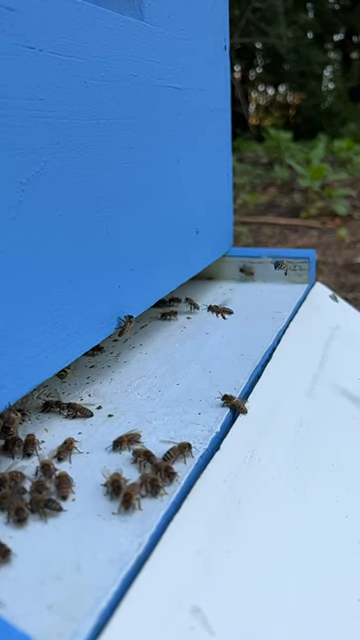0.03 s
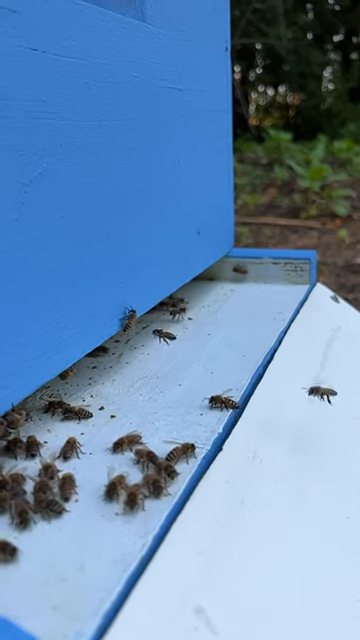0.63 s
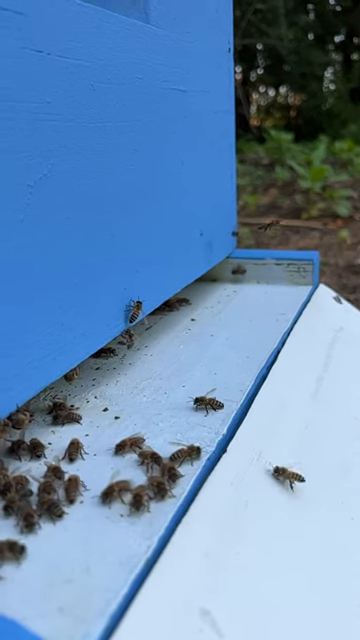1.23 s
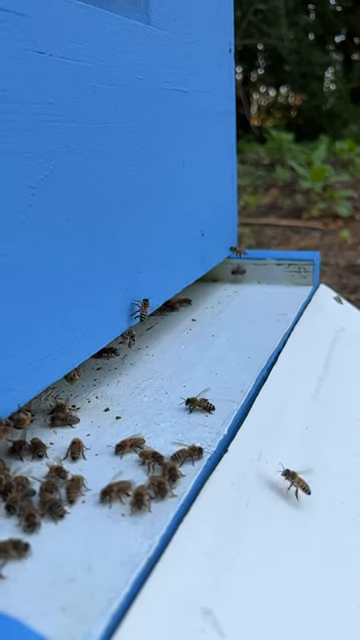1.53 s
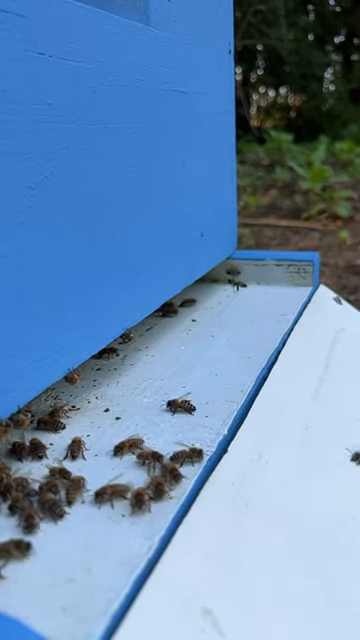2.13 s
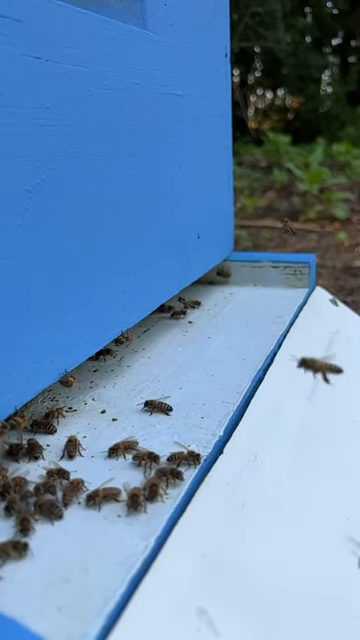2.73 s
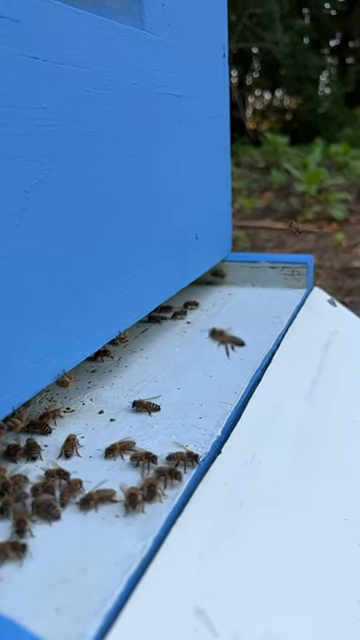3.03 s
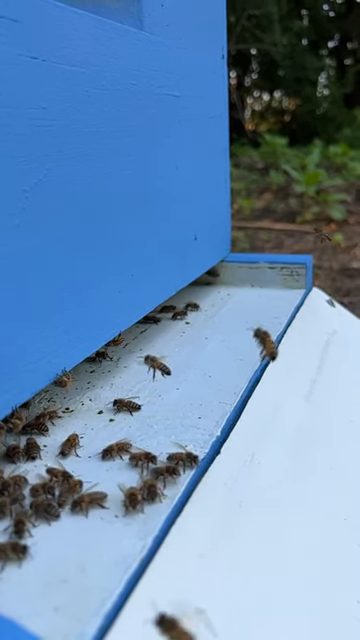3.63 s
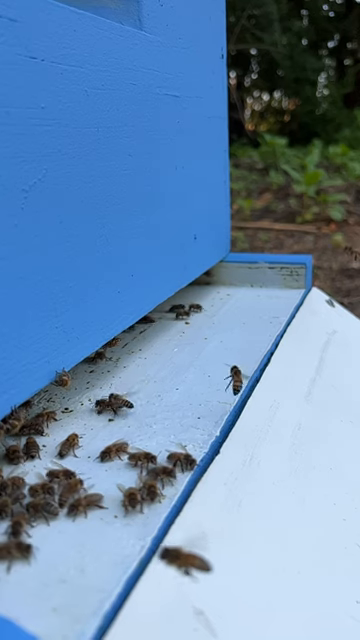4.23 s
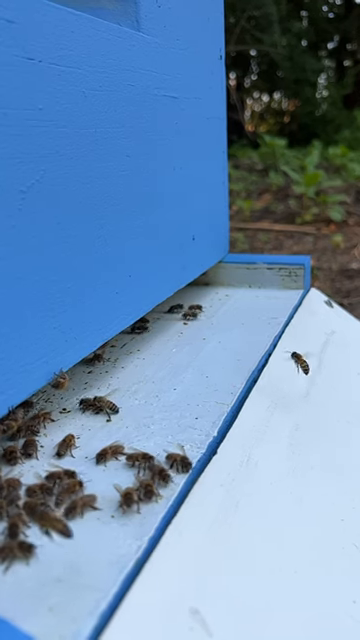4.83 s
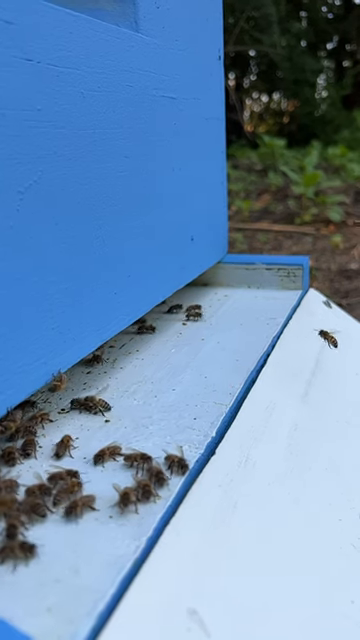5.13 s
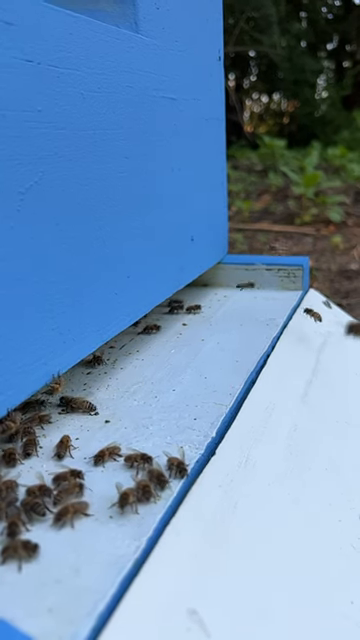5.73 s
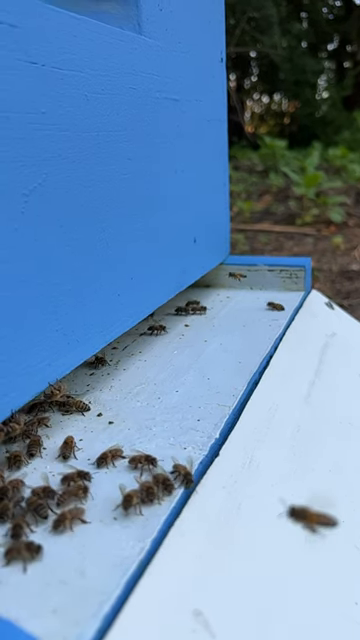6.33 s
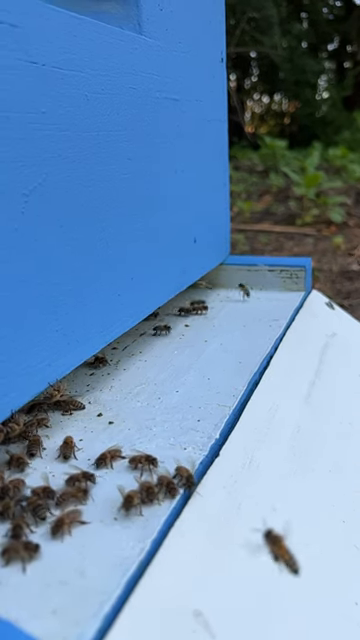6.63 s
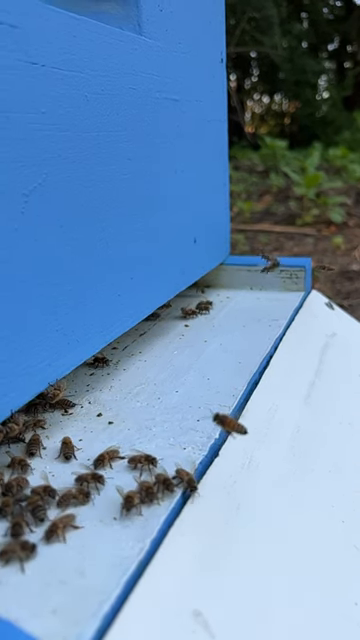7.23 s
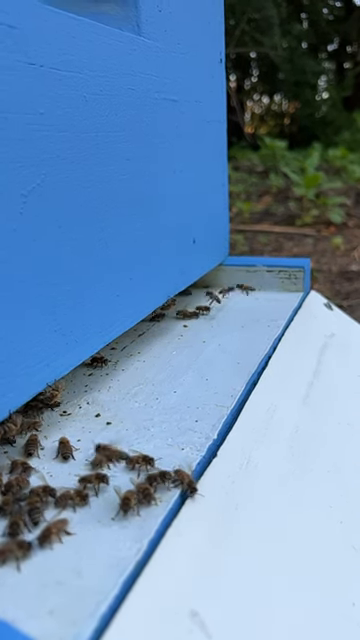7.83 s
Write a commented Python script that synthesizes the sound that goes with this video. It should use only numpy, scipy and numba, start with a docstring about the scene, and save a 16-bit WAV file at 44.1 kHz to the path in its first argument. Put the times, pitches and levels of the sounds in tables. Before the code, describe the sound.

Honeybees buzz steadily around a hive entrance outdoors, over a deep, wavering drone and a faint rustle of wings.

```python
"""At a hive entrance outdoors, honeybees buzz as if in slow motion, over a deep drone that hops in pitch.
Each flying bee buzzes with overtones, whole multiples of its wingbeat; where these crowd together,
the strongest takes the lead. The lowest tone jumps about and drops into deep throbs, while single
bees glide close by and sing out above the swarm. The high tones blend into a rustle of wings,
and faint outdoor air lies behind."""
import sys
import numpy as np
from scipy import signal
from scipy.fft import rfft, irfft, next_fast_len
from scipy.io import wavfile
from scipy.ndimage import uniform_filter1d
from numba import njit

SR = 44100
rng = np.random.default_rng(int(sys.argv[2]) if len(sys.argv) > 2 else 0)


def wav_out(sig):
    """Save sig, one row per channel (or a flat mono array), as 16-bit PCM at SR to the path in sys.argv[1]."""
    wavfile.write(sys.argv[1], SR, np.round(np.clip(np.atleast_2d(sig).T, -1, 1) * 32767).astype(np.int16))


N = 356504
HOP = 64   # samples from one tick to the next; pitch and level are set at each tick
TICKS = np.arange(N // HOP + 2) * HOP / SR
HARMONICS = np.arange(2, 15)[:, None]   # overtones at 2 to 14 times the wingbeat
LEAD_RATE_HZ, CUTOFF_HZ = 2.8, 15800   # how fast overtones trade the lead; top of the sound


def from_db(db):
    """Turn decibels into a number to multiply a sound by."""
    return 10 ** (np.asarray(db) / 20)


def in_time(rows):
    """Read a table that starts with a time column at every tick."""
    time_s, *columns = np.transpose(rows)
    return [np.interp(TICKS, time_s, column) for column in columns]


def at_hz(points, hz):
    """Read a table at any pitch, giving every octave equal room."""
    pitch_hz, value = np.transpose(points)
    return np.interp(np.log(np.maximum(hz, 1)), np.log(pitch_hz), value)


def drift(rate_hz, count):
    """Smooth random curves, typically 1 away from zero, moving not much faster than rate_hz."""
    size = next_fast_len(len(TICKS))
    hz = np.arange(size // 2 + 1) * SR / HOP / size
    noise = rfft(rng.standard_normal((count, size)))
    slow = irfft(noise * np.exp(-.5 * (hz / rate_hz) ** 2), size)[:, :len(TICKS)]
    return slow / slow.std()


def flicker(count):
    """Swelling and fading, several times a second, as bees turn and pass."""
    return np.minimum(.3 * drift(1.5, count) + drift(6.5, count), 2.0)


def held_notes(rows, slide_s, swell_s, arch_db=4):
    """Each note holds its pitch until the next and swells in the middle; the steps are rounded off."""
    start_s, hz, level_db = np.transpose(rows)
    edges_s = np.append(np.sort(start_s), TICKS[-1] + 0.011)
    place = np.interp(TICKS, edges_s, np.arange(len(edges_s)))
    note = place.astype(int)
    arch = arch_db * (np.sin(np.pi * (place % 1)) - 2 / np.pi)
    rounded = lambda steps, width_s: uniform_filter1d(steps, size=max(1, int(width_s * SR / HOP)))
    return rounded(hz[note], slide_s), rounded(level_db[note] + arch, swell_s)


@njit
def oscillators(turn, gain, hop, size):
    """Add up pure tones, each a point spinning on a circle; each ear's gain glides between ticks."""
    out = np.zeros((2, turn.shape[1] * hop))
    for tone in range(turn.shape[0]):
        point = 1 + 0j
        for tick in range(turn.shape[1] - 1):
            left, right = gain[0, tone, tick], gain[1, tone, tick]
            if abs(left) + abs(right) > 1e-7:
                left_step = (gain[0, tone, tick + 1] - left) / hop
                right_step = (gain[1, tone, tick + 1] - right) / hop
                for i in range(hop):
                    point *= turn[tone, tick]
                    out[0, tick * hop + i] += ((left + i * left_step) * point).real
                    out[1, tick * hop + i] += ((right + i * right_step) * point).real
    return out[:, :size]


# How much weaker bees make a tone tremble: pitch_hz, roughness (0 to 1)
ROUGHNESS = [(60, .03), (120, .035), (220, .07), (450, .075), (700, .08), (2200, .11), (3500, .24),
             (8000, .3)]
# Which side the sound sits on: pitch_hz, lean (-1 right to 1 left)
SIDE_LEAN = [(70, 0), (200, -0.0542), (380, -0.16), (700, -0.74), (1300, 0), (2400, -0.16), (5000, 0.02),
             (15000, -0.05)]
# How far it scatters between the ears: pitch_hz, scatter_db
SIDE_SCATTER = [(60, -18.5), (130, -26), (220, -15), (400, -7.5), (700, 0), (1400, -9), (3000, -3),
                (6000, -2.5), (14000, -1)]

def tones(hz, level_db, roam_hz):
    """Gliding tones, roughened by weaker bees beating against them, each roaming between the ears."""
    count, beat_hz = len(hz), 60
    beating = 1 + at_hz(ROUGHNESS, hz) * (drift(beat_hz, count) + 1j * drift(beat_hz, count))
    start_phase = np.exp(2j * np.pi * rng.random((count, 1)))
    middle = np.sqrt(2) * from_db(level_db) * beating * start_phase
    roam = (drift(roam_hz, count) + 1j * drift(roam_hz, count)) / np.sqrt(2)
    side = at_hz(SIDE_LEAN, hz) + from_db(at_hz(SIDE_SCATTER, hz)) * roam
    ears = np.array([middle * (1 + side), middle * (1 - side)])
    return oscillators(np.exp(2j * np.pi * hz / SR), ears, HOP, N)


# The notes of the lowest, strongest tone: start_s, pitch_hz, level_db
DRONE_NOTES = [(0.0, 115, -44), (0.08, 119, -47.5), (0.17, 75.6, -49), (0.24, 98.6, -52), (0.29, 61, -41.5),
               (0.37, 110.8, -48), (0.49, 118.4, -41.5), (0.54, 63.4, -42), (0.63, 99.8, -56.5),
               (0.66, 77, -49), (0.69, 97.3, -45), (0.76, 94.7, -49), (0.82, 103.8, -45.5),
               (0.9, 84.8, -47), (0.94, 84.5, -41.5), (1.03, 109.3, -50.5), (1.09, 65.3, -50),
               (1.12, 109, -45), (1.24, 134.7, -48.5), (1.33, 57, -44), (1.43, 135.4, -58),
               (1.46, 124.7, -43), (1.52, 111, -49), (1.59, 63, -47), (1.63, 122.4, -45.5),
               (1.69, 104.3, -39), (1.73, 88, -41.5), (1.77, 71, -42.5), (1.84, 84.1, -45.5),
               (1.93, 68.4, -45), (1.99, 114.5, -41), (2.05, 57.8, -38), (2.08, 60, -32.5),
               (2.18, 58.8, -41), (2.28, 62.9, -31.5), (2.35, 104, -38.5), (2.4, 61.6, -33),
               (2.43, 65, -28.0), (2.51, 65.9, -34.0), (2.54, 66.7, -41.5), (2.61, 63.8, -36.5),
               (2.68, 58.8, -41.0), (2.71, 129.6, -45), (2.78, 70.8, -44), (2.82, 70.9, -35.5),
               (2.89, 122, -43), (3.0, 124.4, -49), (3.12, 146.5, -46.5), (3.19, 133.7, -47.5),
               (3.27, 120.4, -48), (3.32, 126.5, -43.5), (3.54, 99.2, -43), (3.65, 124.8, -42),
               (3.71, 80.2, -41), (3.78, 63.6, -41.5), (3.94, 120.7, -46), (4.05, 107.7, -44.5),
               (4.22, 54.6, -51), (4.26, 123.5, -44), (4.42, 106, -43), (4.45, 76, -49.5),
               (4.55, 108, -49.5), (4.59, 119.8, -42.5), (4.71, 129.4, -47), (4.8, 64.1, -42.5),
               (4.84, 83.5, -53), (4.87, 125.6, -45), (4.92, 71.6, -44.5), (4.95, 109.4, -37),
               (5.01, 110, -44), (5.05, 96.8, -48), (5.11, 121.2, -46.5), (5.28, 61.2, -42.5),
               (5.4, 126.8, -46.5), (5.5, 120, -38.5), (5.54, 65.7, -45), (5.58, 121.5, -42.5),
               (5.71, 145.3, -51), (5.74, 63.2, -44), (5.82, 104.1, -44), (5.86, 125.2, -45),
               (5.93, 64, -49.5), (5.99, 125.6, -46), (6.04, 119.6, -38.5), (6.1, 70.1, -43),
               (6.13, 118.4, -44.5), (6.2, 116.7, -50), (6.27, 106.7, -42), (6.41, 68, -44),
               (6.44, 122, -43.5), (6.56, 124.1, -57), (6.59, 66.5, -47), (6.62, 113.5, -45),
               (6.68, 126.8, -46.5), (6.71, 60.5, -49), (6.79, 105.9, -42), (6.84, 119.4, -46.5),
               (7.01, 107.4, -40.5), (7.07, 78.9, -43), (7.1, 128.7, -46.5), (7.16, 112.9, -46.5),
               (7.24, 69.1, -42), (7.3, 86.3, -42), (7.35, 114.6, -44.5), (7.43, 121.6, -42.5),
               (7.55, 125.4, -46.5), (7.62, 75.4, -46), (7.67, 84.7, -43), (7.76, 73.9, -47),
               (7.8, 119.4, -39.5), (7.83, 110.6, -44), (7.87, 124.6, -41.5), (7.92, 59.9, -41),
               (7.95, 90, -47.0), (8.04, 81.66, -40)]

def drone(flicker_db=1.05, waver_hz=3, rumble_db=-29, rumble_hz=28):
    """The lowest tone jumps about over a faint rumble, now and then an octave down into a throb."""
    hz, level_db = held_notes(DRONE_NOTES, slide_s=0.018, swell_s=0.046)
    hz = hz + waver_hz * drift(12.25, count=1)
    tone = tones(hz, level_db + flicker_db * flicker(count=1), roam_hz=0.71)
    rumble = from_db(level_db + rumble_db) * drift(rumble_hz, count=1)[0]
    return tone + np.interp(np.arange(N) / SR, TICKS, rumble)


# The notes of the three tones above the drone: start_s, pitch_hz, level_db
LOW_NOTES = [(0.0, 262, -62), (0.04, 212, -70), (0.11, 223, -56), (0.26, 206, -51), (0.43, 226, -62),
             (0.49, 214, -49.5), (0.76, 218.6, -51), (0.89, 186.6, -59.5), (0.93, 194, -46),
             (1.0, 220, -52), (1.24, 243.2, -52.5), (1.3, 219, -48), (1.75, 235.4, -53.5),
             (1.85, 177, -43.5), (1.9, 213, -43.5), (1.98, 239.5, -52), (2.05, 202, -55),
             (2.13, 171.8, -49), (2.19, 223, -54), (2.28, 215.7, -47), (2.39, 174, -42.5),
             (2.46, 211, -55.0), (2.64, 173.6, -48.5), (2.68, 197.4, -61), (2.84, 168, -52),
             (2.87, 218.7, -52.5), (3.14, 168.6, -61), (3.24, 235.5, -59), (3.48, 164.4, -65),
             (3.53, 196.5, -48.5), (3.59, 234.6, -52.5), (3.68, 178, -57.5), (3.74, 217.7, -52),
             (3.9, 199.2, -53.5), (4.16, 247, -54), (4.21, 217.3, -53), (4.81, 185.5, -52.5),
             (4.87, 228.4, -58), (5.05, 182.5, -58), (5.1, 230.3, -58), (5.19, 201.7, -51.5),
             (5.4, 252, -60), (5.56, 221.3, -54), (5.71, 167.7, -48.5), (5.78, 219.7, -50.5),
             (6.07, 186.4, -53), (6.13, 225.6, -56.5), (6.33, 213, -48.5), (6.42, 228.5, -58),
             (6.69, 173.3, -47.5), (6.78, 228, -54), (6.83, 200.5, -54), (7.05, 235, -59),
             (7.18, 210.8, -45), (7.29, 190.5, -52.0), (7.42, 218.6, -51), (7.68, 211.6, -56),
             (7.99, 211.4, -44)]
MIDDLE_NOTES = [(0.0, 361, -60.5), (0.15, 338, -60.5), (0.489, 412.5, -52), (0.6, 343, -61),
                (0.98, 364, -57.5), (1.06, 383, -65), (1.37, 336, -65.5), (1.65, 379, -60.5),
                (2.05, 351, -58), (2.431, 370, -54), (2.61, 347, -64), (2.682, 405, -53.5),
                (2.82, 351.5, -55.5), (2.92, 404.3, -58), (3.049, 344, -62), (3.13, 388, -59.5),
                (3.54, 413, -57.5), (3.649, 343, -65), (3.741, 411, -60.0), (3.82, 397.3, -52),
                (3.93, 372, -55), (4.36, 389.5, -50.5), (4.46, 384, -61.5), (4.82, 347.5, -58.5),
                (4.93, 399.5, -53.5), (5.02, 370, -57.0), (5.42, 388.5, -58.5), (5.77, 390.5, -55.5),
                (6.06, 330, -61.5), (6.16, 414, -74), (6.21, 337.4, -64.0), (6.35, 374.6, -53.5),
                (6.479, 404, -60), (6.641, 377, -52.5), (6.83, 357, -58.5), (6.949, 389, -56.5),
                (7.21, 349, -60), (7.27, 391.3, -57), (7.42, 367.6, -59.0), (7.71, 335.5, -60.5),
                (7.879, 407, -54), (8.0, 369, -57)]
HIGH_NOTES = [(0.0, 483, -57.5), (0.151, 436, -59), (0.23, 487, -59.5), (0.52, 421, -53), (0.56, 495, -56),
              (0.612, 453, -59), (0.67, 441, -53.5), (0.83, 467, -65), (0.899, 450, -54.5),
              (1.11, 429, -54), (1.189, 465, -59), (1.34, 445, -59.5), (1.68, 494, -62), (1.81, 447.4, -55),
              (2.15, 486, -63.5), (2.359, 427, -57), (2.41, 488, -67), (2.48, 426, -59), (2.74, 495, -54),
              (2.771, 431, -57), (2.99, 459, -62), (3.169, 490, -69.5), (3.62, 433, -63.5),
              (3.79, 487, -63), (3.96, 433, -61), (4.06, 468, -60.5), (4.14, 480, -71), (4.399, 465, -54.5),
              (4.56, 469, -62), (5.55, 482, -59), (6.05, 437, -63.5), (6.351, 492, -69),
              (6.481, 421, -71.5), (6.63, 472, -56.5), (6.761, 502, -62), (6.879, 472, -66),
              (7.77, 433, -62), (7.88, 477, -56.5), (8.001, 427, -52), (8.04, 468, -60)]
# How unsteady those three are, lowest first: waver_hz, flicker_db
REEDY_WOBBLE = [(7.03, 2), (4.17, 1), (5.4, 3)]

def reedy_tones(level_db=-1):
    """Pitch and level of three reedy tones; they break as the lead passes from bee to bee."""
    notes = [held_notes(rows, slide_s=0.035, swell_s=.025, arch_db=4.5)
             for rows in (LOW_NOTES, MIDDLE_NOTES, HIGH_NOTES)]
    hz, tone_db = np.transpose(notes, (1, 0, 2))
    waver_hz, flicker_db = np.transpose(REEDY_WOBBLE)[:, :, None]
    return hz + waver_hz * drift(6.47, len(hz)), tone_db + level_db + flicker_db * flicker(len(hz))


# Bees flying close by, one list of points for each: time_s, wingbeat_hz, level_db
FLIGHT_PATHS = [
    [(0, 240, -0.5), (.14, 245, -5.5), (.28, 248, -2.5), (.45, 237, -2), (.6, 229, 1), (.76, 223.7, -1.5),
     (1.0, 228.6, 0), (1.32, 231.5, -2.5)],
    [(.8, 213, -2.5), (1.05, 210.9, -2), (1.3, 209.3, 0), (1.46, 205.7, -3)],
    [(1.44, 281.7, -1.5), (1.58, 274, 2.5), (1.74, 247.7, 4.5), (1.9, 251.4, 3), (2.08, 253, 1.5),
     (2.2, 251, -2), (2.5, 260.2, -0.5)],
    [(1.38, 223, -3), (1.6, 227, -3.5), (1.85, 220.5, 2), (2.0, 225.4, -3.5), (2.13, 231.5, -1)],
    [(2.18, 197.8, -4.5), (2.3, 207.3, -5), (2.5, 215.2, -4), (2.65, 212.6, -4.5), (2.8, 204.5, 2)],
    [(2.58, 237.4, -2.5), (2.7, 237, -5), (2.8, 232.4, -3.5), (3.0, 228.9, -1.5), (3.2, 237.7, -1.5)],
    [(3.18, 247.7, -1.5), (3.3, 253.4, -8), (3.45, 241.8, -6.5), (3.62, 250.7, -6), (3.8, 239.5, -5)],
    [(3.98, 244.8, -1), (4.15, 238.2, -2.5), (4.3, 234, 3), (4.57, 229, 0), (4.67, 241, -3.5),
     (4.8, 235.8, -3), (5.0, 231.3, -4.5), (5.22, 238.8, -8)],
    [(5.05, 186.6, -6), (5.16, 183.7, -5), (5.48, 195, -8.5), (5.8, 187, -8.5), (6.0, 204.4, -1)],
    [(5.45, 235.8, -1.5), (5.7, 238.1, -2), (5.9, 237.4, -2), (6.08, 234.4, -6.5)],
    [(6.48, 269, -3.5), (6.8, 250.6, -3), (6.97, 235, 2), (7.1, 232, -4.5), (7.35, 242.6, 0),
     (7.5, 244.2, 0.5), (7.65, 233.8, -4.5), (7.9, 240.3, -0.5)],
    [(6.96, 196.4, -1.5), (7.15, 194.9, -4.5), (7.3, 200.3, -4), (7.45, 191.1, -2.5), (7.65, 196.1, -1.5),
     (7.9, 201.4, -3.5), (8.08, 207.5, -4)],
]
# How strong a close bee's overtones are: pitch_hz, level_db
CLOSE_OVERTONES = [(380, -64), (480, -64.5), (540, -59.5), (720, -69), (1000, -67), (1200, -66.5),
                   (1700, -71.5), (2300, -75.5), (3000, -87)]

def close_bees(waver_hz=0.547, uneven_db=2.5, fade_db_per_s=250):
    """Pitch and level of each close bee's overtones; it fades in and out at the ends of its path."""
    hz, level_db = [], []
    for path in FLIGHT_PATHS:
        wingbeat_hz, near_db = in_time(path)
        outside_s = np.maximum(0, np.maximum(path[0][0] - TICKS, TICKS - path[-1][0]))
        overtone_hz = HARMONICS * (wingbeat_hz + waver_hz * drift(6.64, count=1))
        overtone_db = at_hz(CLOSE_OVERTONES, overtone_hz) + near_db - fade_db_per_s * outside_s
        hz.append(overtone_hz)
        level_db.append(overtone_db + uneven_db * drift(LEAD_RATE_HZ, len(HARMONICS)))
    return np.vstack(hz), np.vstack(level_db)


# How strong the farther bees' overtones are: pitch_hz, level_db
SWARM_OVERTONES = [(400, -85), (560, -68), (730, -69.5), (1150, -71), (1400, -75.5), (1700, -76),
                   (2050, -81.5), (2600, -82), (3000, -95), (3600, -105)]
# The swarm grows louder as it comes nearer: time_s, extra_db
SWARM_NEARNESS = [(0, -0.31), (1.0, 0.51), (1.7, 1.08), (2.9, 0.68), (3.5, -1.57), (4.3, -0.8), (5.05, -2),
                  (5.7, -1.33), (6.5, -1.14), (7.5, 1.5), (8.08, -1.2)]

def swarm(bees=7, wander_hz=9, swell_db=1.0, uneven_db=3, level_db=-1):
    """Pitch and level of the farther bees' overtones; each bee wanders around its own wingbeat."""
    wingbeats_hz = np.linspace(185, 268, bees)[:, None] + wander_hz * drift(1.6, bees)
    hz = np.vstack([HARMONICS * wingbeat for wingbeat in wingbeats_hz])
    bee_db = swell_db * np.repeat(drift(1.5, bees), len(HARMONICS), axis=0)
    overtone_db = at_hz(SWARM_OVERTONES, hz) + uneven_db * drift(LEAD_RATE_HZ, len(hz))
    return hz, overtone_db + bee_db + in_time(SWARM_NEARNESS)[0] + level_db


def stray_bees(hz, level_db, under_db=-21, flicker_db=8.0, stray_hz=10):
    """Bees off the common pitch sound briefly in the gaps between the given tones."""
    gap_hz, beside_db = [(rows[:-1] + rows[1:]) / 2 for rows in (hz, level_db)]
    count = len(gap_hz)
    own_hz = gap_hz + stray_hz * drift(4.01, count)
    return tones(own_hz, beside_db + under_db + flicker_db * flicker(count), roam_hz=7.7)


def give_way(hz, level_db, step_hz=10, reach_steps=7, contrast=9):
    """Where tones crowd close in pitch, the strongest stands out and its neighbours sink."""
    step = np.maximum(hz / step_hz, 0).astype(int)
    tick = np.broadcast_to(np.arange(len(TICKS)), hz.shape)
    strength = from_db(contrast * np.maximum(level_db - level_db.max(), -70))
    grid = np.zeros((step.max() + 2 * reach_steps, len(TICKS)))
    np.add.at(grid, (step, tick), strength)
    nearby_total = signal.lfilter(np.ones(2 * reach_steps + 1), [1], grid, axis=0)
    share = uniform_filter1d(strength / nearby_total[step + reach_steps, tick], size=24)
    return level_db + 10 * np.log10(np.maximum(share, .008))


def crowd_buzz(swerve_hz=8.5, flicker_db=2.5):
    """Reedy tones, close bees and swarm buzz together, each tone swerving; strays fill the low gaps."""
    lowest = held_notes(DRONE_NOTES, slide_s=0.049, swell_s=0.23)
    reedy = reedy_tones()
    hz, level_db = [np.vstack(parts) for parts in zip(reedy, close_bees(), swarm())]
    level_db = give_way(hz, level_db) + flicker_db * flicker(len(hz))
    level_db += brush_past_db(hz.mean(axis=1, keepdims=True))
    buzz = tones(hz + swerve_hz * drift(5.5, len(hz)), level_db, roam_hz=2.5)
    low_hz, low_db = [np.vstack(parts) for parts in zip(lowest, reedy)]
    return buzz + stray_bees(low_hz, low_db)


# Air stirred by the nearest wings: time_s, level_db
STIRRED_AIR = [(0, -65.5), (1.4, -68), (1.6, -64), (2.3, -66), (2.6, -65), (3.3, -66.5), (4.05, -65.5),
               (4.5, -69), (5.25, -71), (5.6, -65.5), (6.7, -66.5), (8.08, -68.5)]

def rustle_swell_db(hz):
    """How far the wing rustle rises and falls from its usual level, bees brushing past included."""
    level_db = in_time(STIRRED_AIR)[0]
    return level_db - level_db.mean() + brush_past_db(hz)


def taking_turns(hz, level_db, spread_hz=24, waver_hz=10, sharpness=4.4, dip=1.26):
    """Two bees share each tone, each on its own pitch; they beat and the tone dips as the lead changes."""
    count = len(hz)
    lead = np.tanh(sharpness * drift(4.16, count))
    pair = 0
    for share in (.5 + lead / 2, .5 - lead / 2):
        own_hz = hz + spread_hz * drift(3, count) + waver_hz * drift(11.1, count)
        pair = pair + tones(own_hz, level_db + dip * 20 * np.log10(share + 1e-6), roam_hz=4.7)
    return pair


# How strong each high overtone in the rustle is: pitch_hz, level_db
RUSTLE_OVERTONES = [(2500, -83.5), (2800, -83), (3200, -89), (5000, -92.5), (6500, -91.5), (8500, -89.5),
                    (11300, -90), (12200, -95.5), (15800, -94.5)]

def wing_rustle(lowest_hz=2582, spacing_hz=111.1, bend_hz=16, flicker_db=5.0, follow=0.85):
    """Tightly packed high overtones blend into a rustle: neighbours bend together, each flickers alone."""
    hz = np.arange(lowest_hz, CUTOFF_HZ, spacing_hz)[:, None]
    bend = uniform_filter1d(drift(1.7, len(hz)), size=4, axis=0)
    level_db = at_hz(RUSTLE_OVERTONES, hz) + follow * rustle_swell_db(hz) + flicker_db * flicker(len(hz))
    return taking_turns(hz + bend_hz * bend / bend.std(), level_db)


# The steady hush of outdoor air: pitch_hz, level_db (in each 1 Hz slice)
AIR_HUSH = [(20, -94), (40, -97), (65, -102), (150, -99), (300, -100), (600, -108), (1200, -110),
            (2500, -113), (3500, -117), (5200, -118), (9000, -116), (11300, -116), (12300, -123),
            (16000, -123)]

def outdoor_air(follow=0.49):
    """Soft, wide outdoor noise; it swells when wings come near, most of all in the treble."""
    hz = np.arange(N // 2 + 1) * SR / N
    middle, side = rfft(rng.standard_normal((2, N))) * from_db(at_hz(AIR_HUSH, hz)) * np.sqrt(SR / 2)
    side = at_hz(SIDE_LEAN, hz) * middle + from_db(at_hz(SIDE_SCATTER, hz)) * side
    ears = np.array([middle + side, middle - side])
    stirred_share = at_hz([(1200, 0.26), (3000, 0.49)], hz)
    swell_db = follow * np.interp(np.arange(N) / SR, TICKS, rustle_swell_db(5000))
    return irfft(ears * (1 - stirred_share), N) + irfft(ears * stirred_share, N) * from_db(swell_db)


# Bees brushing past: peak_s, extra_db, length_s, pitch_hz, width_octaves
BRUSH_PASSES = [(1.611, 0.5, 0.075, 8140, 1), (2.852, 6.5, 0.9, 6660, 0.15), (2.966, 2, 0.16, 6950, 3),
                (4.031, 1.5, .2, 3700, 1.25), (5.478, 6, .08, 3390, 2.1), (5.95, 8, 0.083, 3193, 1.29),
                (5.946, 9, .11, 9900, 2.2), (6.93, 9.5, 0.13, 8560, 0.35), (7.319, 13, .13, 11100, 0.15),
                (7.33, 8, .12, 9000, 0.16)]

def brush_past_db(hz):
    """A bee brushing past briefly lifts the level around one high pitch, its own for each pass."""
    peak_s, extra_db, length_s, pitch_hz, width_octaves = np.transpose(BRUSH_PASSES)
    across_pitch = 2 ** -(2 * np.log2(hz / pitch_hz) / width_octaves) ** 2
    across_time = 2 ** -(2 * (TICKS - peak_s[:, None]) / length_s[:, None]) ** 2
    return (extra_db * across_pitch) @ across_time


def scene():
    """Drone, buzz, rustle and air sound together at the hive entrance."""
    return drone() + crowd_buzz() + wing_rustle() + outdoor_air()


def record(dry):
    """Cut away the very highest treble with a steep filter."""
    return signal.sosfilt(signal.ellip(12, .1, 80, CUTOFF_HZ, fs=SR, output="sos"), dry)


dry = scene()
out = record(dry)
wav_out(out)
```